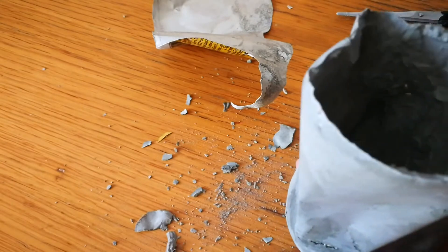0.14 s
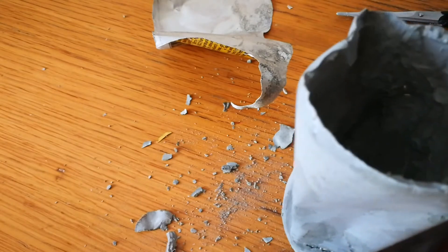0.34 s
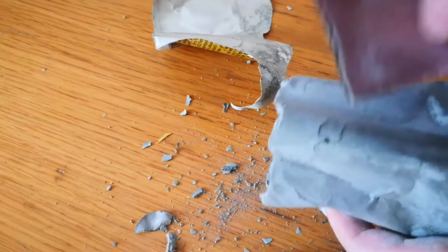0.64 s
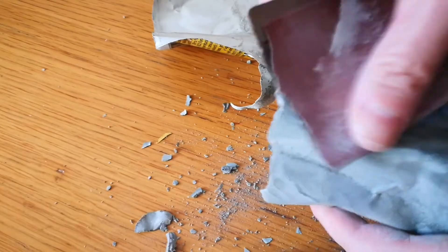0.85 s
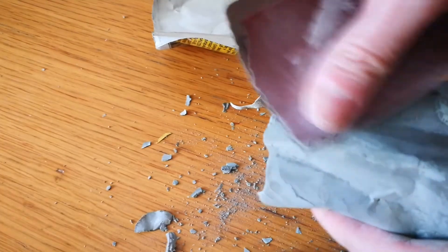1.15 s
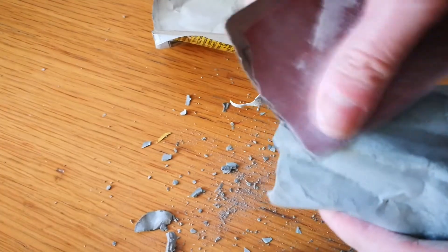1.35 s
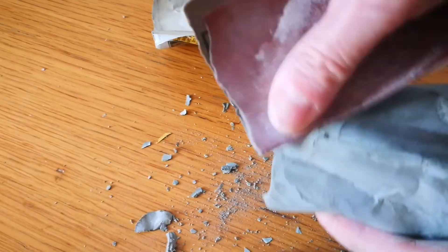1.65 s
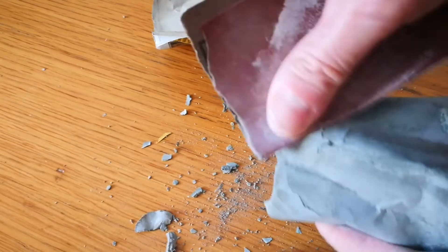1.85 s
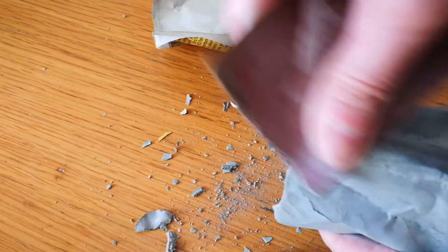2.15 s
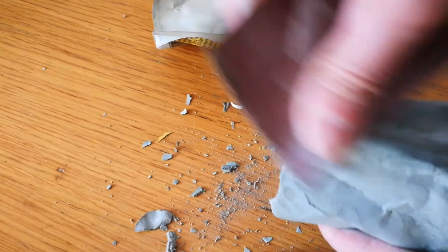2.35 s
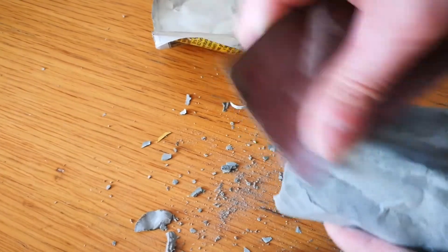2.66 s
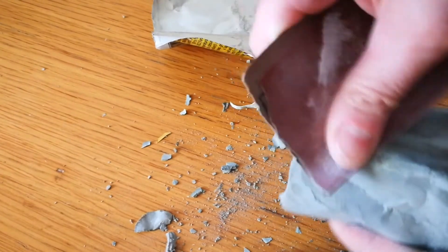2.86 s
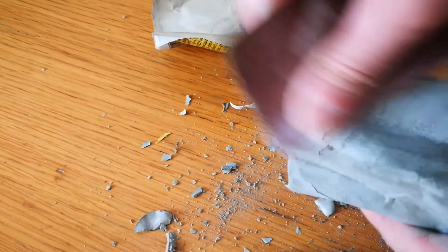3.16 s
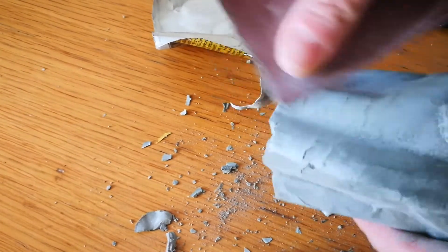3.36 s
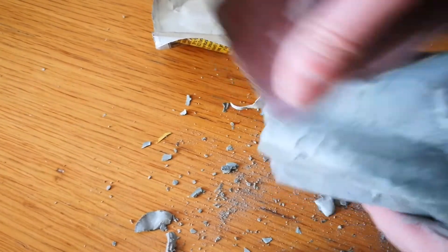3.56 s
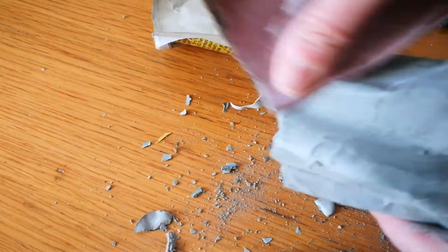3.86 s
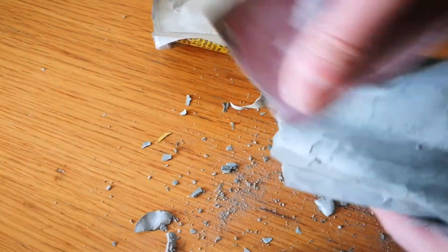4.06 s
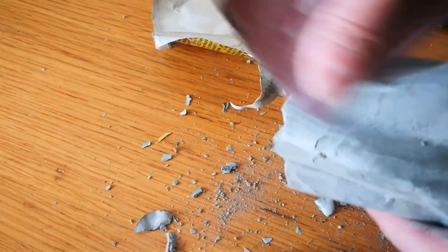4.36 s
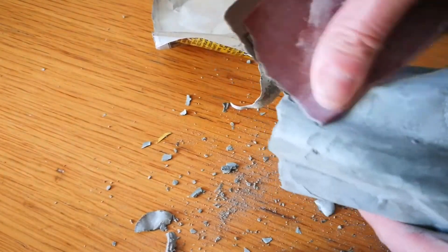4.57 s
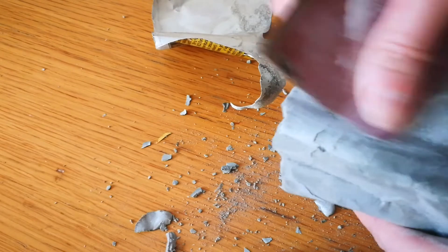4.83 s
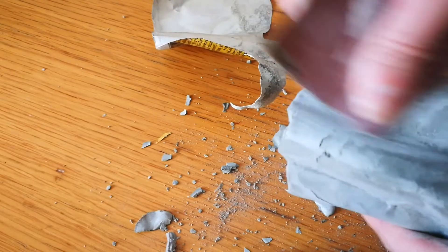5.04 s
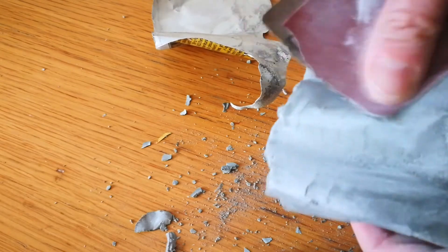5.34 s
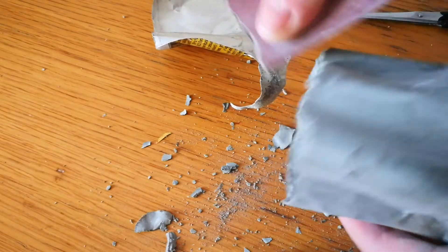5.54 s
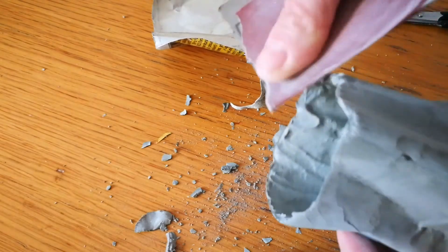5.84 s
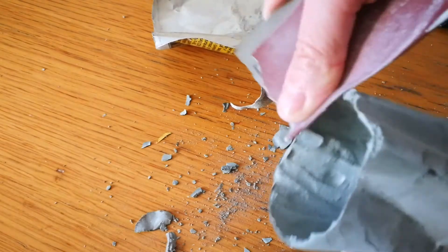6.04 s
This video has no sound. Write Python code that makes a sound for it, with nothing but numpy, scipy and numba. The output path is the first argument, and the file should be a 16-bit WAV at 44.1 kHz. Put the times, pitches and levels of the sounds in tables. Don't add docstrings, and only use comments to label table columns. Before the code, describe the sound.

Stiff sandpaper rasps rapidly back and forth over a small cement pot, in bright gritty bursts broken by short pauses and tiny crumb cracks.

```python
import sys
import numpy as np
from scipy import signal
from scipy.fft import rfft, irfft
from scipy.io import wavfile
from scipy.ndimage import uniform_filter1d
from numba import njit

SR = 44100
rng = np.random.default_rng(int(sys.argv[2]) if len(sys.argv) > 2 else 0)


def amp(db):
    return 10 ** (np.asarray(db, float) / 20)


def write(x):
    x = np.atleast_2d(x).T
    wavfile.write(sys.argv[1], SR, np.round(np.clip(x, -1, 1) * 32767).astype(np.int16))


N = 273420
T = np.arange(N) / SR


def curve(hz, points):
    f, v = np.transpose(points)
    return np.interp(np.log(hz + 1), np.log(f + 1), v)


def causal(db):
    c = irfft(db * np.log(10) / 20)
    c[1:len(c) // 2] *= 2
    c[len(c) // 2 + 1:] = 0
    return irfft(np.exp(rfft(c)))


def unit(x):
    return x / np.sqrt(np.mean(x ** 2))


def walk(rate):
    hold = int(SR / rate)
    levels = np.repeat(rng.standard_normal(N // hold + 1), hold)
    return 1.616 * uniform_filter1d(uniform_filter1d(levels, hold), hold)[:N]


def air():
    # (f/Hz, level/dB per Hz)
    air_colour = [(20, -15), (60, -15), (110, -18), (250, -17.5), (400, -24.5), (800, -27), (8700, -34),
                  (15800, -46)]
    # (f/Hz, level/dB)
    hum_tones = [(100, -75), (147, -77), (238, -77.5), (735, -85)]
    hz = np.linspace(0, SR / 2, N // 2 + 1)
    width = [np.ones_like(hz), np.clip(0.3 + hz / 900, 0, 1)]
    spectrum = rfft(rng.standard_normal((2, N))) * amp(curve(hz, air_colour))
    mid, side = irfft(spectrum * width, N)
    noise = np.array([mid + side, mid - side]) / np.sqrt(np.mean(mid ** 2)) * amp(-71)
    hum = np.zeros(N)
    for f, db in hum_tones:
        level = amp(db - 0.5 + 1.8 * walk(6.3))
        hum += level * np.sin(2 * np.pi * f * T + 0.23 * walk(4.03))
    return noise + hum


def ramp(t, length_s, attack_s, release_s, steep):
    return np.clip(np.minimum(t / attack_s, (length_s - t) / release_s), 0, 1) ** steep


def contact():
    # (start t/s, length t/s, sheet hiss level/dB, swell start to end level/dB, pot wall minus hiss level/dB)
    strokes = [(0.792, 0.17, -35.0, -15, -14), (0.959, 0.11, -30.5, -9.5, -11.5),
               (1.08, 0.089, -31, -16.5, -12.0), (1.181, 0.098, -32.0, 0, -9.0),
               (1.281, 0.082, -32, -12, -9.5), (1.381, 0.095, -30.5, 7, -9.5),
               (1.475, 0.1, -31, -11, -9.5), (1.593, 0.094, -31.5, 0.5, -8),
               (1.687, 0.1, -30.5, -1, -11), (1.798, 0.095, -31, -4, -9), (1.889, 0.11, -31, 6.5, -10.5),
               (2.022, 0.11, -31.5, 6, -8.0), (2.136, 0.085, -30, -1, -10.5),
               (2.251, 0.1, -32.5, -8.0, -10.5), (2.351, 0.099, -30.5, -4, -10.5),
               (2.467, 0.099, -30.5, 5.5, -10.5), (2.574, 0.1, -33, -3, -10.5),
               (2.697, 0.1, -30.5, -5, -10), (2.797, 0.11, -32, 2, -8.5),
               (2.936, 0.11, -31.5, -10.5, -8.5), (3.061, 0.1, -28.5, -10, -13.5),
               (3.444, 0.12, -26.5, -4.5, -10.5), (3.734, 0.11, -29.0, -7, -11.5),
                   (3.849, 0.1, -26, -3, -11), (3.952, 0.092, -26, 3, -10.5),
                   (4.066, 0.11, -27.5, -10, -11), (4.166, 0.098, -25, -1, -13),
                   (4.273, 0.12, -25.5, -0.5, -15.0), (4.398, 0.097, -26, 7, -10.0),
                   (4.515, 0.11, -25.5, -6, -12.5), (4.644, 0.094, -26, 6, -15.0),
                   (4.762, 0.12, -28, -10.5, -16.5), (4.901, 0.17, -27.5, -15.5, -16),
                   (5.271, 0.16, -28, -1, -13), (5.623, 0.11, -29.5, -7.5, -9.5),
                   (5.88, 0.087, -26, 21, -12), (5.973, 0.061, -27.5, 22, -12)]
    touches = [(.55, 0.082, -46, 10, -5.5), (.632, 0.14, -43.5, -3, -8), (.762, 0.043, -46.5, -4, -1.5),
               (3.272, 0.053, -53.5, -5, -7), (3.33, 0.1, -57, -7, -8), (3.4, 0.046, -43.5, -7, -5),
               (3.689, 0.03, -35, -19, -8), (5.205, 0.058, -40, -12, -6), (5.586, 0.044, -33, 13, -15),
               (5.72, 0.042, -43, -1, -6), (5.82, 0.039, -41.5, -4, -6), (6.04, 0.13, -58, -9, -4.5)]
    # (from t/s, to t/s, hiss level/dB)
    creeps = [
        (.55, .8, -52.5),
        (.8, 3.15, -56.5),
        (3.145, 3.263, -60),
        (3.7, 5.052, -50),
        (5.23, 5.414, -51.5),
        (5.62, 5.8, -54),
        (5.845, 6.25, -58.5),
    ]
    sheet_ramp, wall_ramp = (0.028, 0.034, 1.46), (0.019, 0.032, 1.06)
    touch_ramp = (0.011, 0.02, 1.47)
    sheet, wall = np.zeros(N), np.zeros(N)
    passes = ((strokes, sheet_ramp, wall_ramp), (touches, touch_ramp, touch_ramp))
    for rows, on_sheet, on_wall in passes:
        for s, length_s, db, swell_db, rel_db in rows:
            near = slice(int(s * SR), int((s + length_s) * SR))
            t = T[near] - s
            swell = swell_db * (t / length_s - .5)
            sheet[near] += amp(db + 0.25 + swell) * ramp(t, length_s, *on_sheet)
            wall[near] += amp(db + rel_db - 0.8 + 0.46 * swell) * ramp(t, length_s, *on_wall)
    creep = sum(amp(db) * ramp(T - a, b - a, *touch_ramp) for a, b, db in creeps)
    return np.hypot(sheet, creep), np.hypot(wall, creep * amp(-9))


def grit(per_s, patchy_db, spread_db=2):
    slips = rng.random(N) < per_s / SR
    size = slips * amp(spread_db * np.minimum(rng.exponential(size=N), 4))
    size = np.sqrt(np.abs(uniform_filter1d(size ** 2, size=3)))
    size = size * amp(patchy_db * walk(45) + patchy_db * walk(220))
    return unit(size * rng.standard_normal((2, N)))


def crumbs():
    # (t/s, level/dB, pot wall minus hiss level/dB, decay t/ms)
    cracks = [(0.571, -50.5, 4, 3), (.705, -38, -0.5, 3.6), (.824, -26, -20, 2.3), (.868, -31, -21, 3.3),
              (0.983, -41, -17, 1.2), (2.191, -22, -14, 1.2), (3.127, -48, -5, 2), (3.15, -46, 7, 3.9),
              (3.404, -38, 4.5, 1.2), (3.413, -34.5, -5, 3.3), (3.69, -40.5, -5, 0.92),
              (3.362, -51, -12, 2.3), (5.057, -33, -15, 2.7), (5.218, -31.5, -12, 2.6),
              (5.395, -48, -3, 3.7), (5.585, -46.5, 4, 1.5), (5.682, -18, -5, 1.04), (5.751, -41.5, 2, 3),
              (5.764, -35, -4.5, 3.2), (5.823, -32, -16, 2.2), (6.012, -31, -8, 1.5), (6.102, -45, -9, 2.5),
              (6.143, -46, -6.5, 13), (6.163, -40.5, -4.5, 7.3), (6.184, -28, -11, 4.6)]
    out = np.zeros((2, 2, N + 600))
    for s, db, rel_db, ms in cracks:
        crack = rng.choice([-1, 1], (2, 600)) * np.exp(-np.arange(600) / (SR * ms / 1000))
        i = int(s * SR)
        out[:, :, i:i + 600] += amp(db + np.array([0, rel_db]))[:, None, None] * crack
    return out[:, :, :N]


def sanding():
    grip_changes = [
        .95,
        3.33,
        5.5,
    ]
    # (f/Hz, level/dB per Hz)
    colours = [
        [(150, -43), (250, -19.5), (565, -20.5), (2300, -11), (3370, -13.5), (3740, -11.5), (6410, -10),
         (9070, 0.5), (15800, -26.5)],
        [(150, -50), (250, -19.5), (786, -18.5), (1110, -2.5), (1320, -13), (2150, -9.5), (2560, -5),
         (3940, -12), (5120, -7), (5680, -12), (9070, 1.5), (15800, -21.5)],
        [(150, -71), (250, -24), (373, -30), (1060, -18.5), (2040, -13.5), (2470, -11.5), (3940, -10.5),
         (4610, -8), (5480, -10.5), (8910, 4), (10200, -1), (15800, -22)],
        [(150, -40.5), (250, -13.5), (984, -15.5), (1210, -1.5), (1420, -6), (1970, -3), (2690, -10),
         (3090, -8.5), (4610, -9.5), (6640, -9.5), (9070, -3), (15800, -28.5)],
    ]
    # (f/Hz, width f/Hz, lift level/dB)
    rings = [
        [(1020, 270, 3.5), (2380, 150, 5), (4150, 420, 0)],
        [(1106, 180, -8), (2540, 220, 0), (3080, 140, 5.5), (4970, 220, -4), (8160, 980, 2), (10420, 180, 6)],
        [(1090, 390, 4), (1763, 130, 4.5), (2490, 110, 2), (4520, 350, 1.5), (7700, 1100, 1.5), (8270, 350, -2)],
        [(1230, 84, 6), (1930, 85, 5.5), (3173, 63, 10.5), (4760, 250, 6.5), (9270, 720, 3.5), (7860, 400, 1.5)],
    ]
    # (f/Hz, side minus mid level/dB)
    spread = [(60, -2), (110, -10), (200, -10), (380, -23), (700, -0.5), (1290, -16.5), (2380, -2),
              (4400, 7), (8120, 1), (15000, -29)]
    # (f/Hz, left minus right level/dB)
    lean = [(60, -45), (110, -14), (200, -3), (380, -3), (700, 3), (1290, -0.5), (2380, 0.5), (4400, -1.5),
            (8120, -1), (15000, 9.5)]
    split_hz = 3500
    hz = np.linspace(0, SR / 2, 1025)
    low = 1 / (1 + (hz / split_hz) ** 8)
    sheet, wall = contact()
    drives = np.array([grit(16000, 0.96) * sheet, grit(11000, 0.96) * wall]) + crumbs()
    edges = [0] + [int(s * SR) for s in grip_changes] + [N]
    out = np.zeros((2, N + 2047))
    for a, b, colour, modes in zip(edges, edges[1:], colours, rings):
        db = curve(hz, colour)
        for f, width, lift_db in modes:
            db = db + lift_db / (1 + (2 * (hz - f) / width) ** 2)
        for share, drive in zip((1 - low, low), drives):
            part_db = db + 10 * np.log10(share + 1e-9)
            part_db = part_db - 10 * np.log10(np.mean(amp(2 * part_db)))
            side_db = part_db + curve(hz, spread) - 5.0
            mid = signal.oaconvolve(drive[0, a:b], causal(part_db))
            side = signal.oaconvolve(drive[1, a:b], causal(side_db))
            out[:, a:b + 2047] += np.array([mid + side, mid - side])
    tilts = [causal(sign * curve(hz, lean) / 2) for sign in (1, -1)]
    return np.array([signal.oaconvolve(x, tilt)[:N] for x, tilt in zip(out, tilts)])


def bend(x, share=0.41, near_ms=0.1965, far_ms=2.2, count=4):
    out = x.copy()
    for ms in np.geomspace(near_ms, far_ms, count):
        for ch in range(2):
            lag = ms * SR / 1000 * amp(1.703 * walk(3.5) + 0.38 * walk(14))
            echo = np.interp(np.arange(N) - lag, np.arange(N), x[ch])
            out[ch] += share * np.tanh(walk(6)) * echo
    return out


def knocks():
    # (t/s, f/Hz, peak level/dB, t60 t/s)
    rim_hits = [
        (6.4, 1260, -38, 0.05),
        (3.128, 1200, -41, .03),
        (.822, 2500, -35, .04),
    ]
    out = np.zeros(N)
    for s, hz, db, t60_s in rim_hits:
        t = np.maximum(T - s, 0)
        envelope = amp(db - 60 * t / t60_s) * (1 - np.exp(-t / .001))
        out += envelope * np.sin(2 * np.pi * hz * t)
    return out


def ride_band(x, order, hz, kind, db):
    band = signal.sosfiltfilt(signal.butter(order, hz, kind, fs=SR, output="sos"), x)
    return x + band * (amp(db) - 1)


def hand(x):
    # (t/s, left minus right level/dB, deep wall tones level/dB, free wall ring level/dB,
    # curled edge facing the phone level/dB)
    hand_moves = [(.6, 1, 6, 0.5, 5.5), (.85, 4, -2.5, 1.5, -1.5), (1.1, 5, -21, -6.5, 0),
                  (1.99, 4.5, 3, 1, 1), (2.63, 4, 6, 3.5, 1.5), (3.1, 2, 3.5, 3, 3.5),
                  (3.27, 6, -5, 0, 4.5), (3.33, 0.5, 13, 0, 3.5), (3.5, 5, -2, -1, 3.5),
                  (3.8, 4.5, -3, -1, 0.5), (4.3, 4.5, 5, 0, -1), (4.48, 3, 4.5, -1.5, 1),
                  (4.75, 4.5, 10, 0, 2.1), (5.15, 3, -11, -0.5, -3), (5.3, 2, -2, 0, 6),
                  (5.5, 4.5, -7, 6, -5.5), (5.7, 2, 3.5, -0.5, 0.8), (6.2, 4, 0.5, 4, -1.5)]
    s, pan_db, deep_db, ring_db, edge_db = np.transpose(hand_moves)
    x = ride_band(x, 2, [4000, 7000], "band", np.interp(T, s, edge_db))
    x = ride_band(x, 2, [850, 1900], "band", np.interp(T, s, ring_db))
    x = ride_band(x, 3, 650, "low", np.interp(T, s, deep_db))
    pan_db = np.interp(T, s, pan_db) - 1.74
    return x * amp(np.array([pan_db, -pan_db]) / 2)


@njit
def walls(x, lags, gain, damp):
    line, soft, out = np.zeros((8, 4096)), np.zeros(8), np.zeros((2, len(x)))
    for i in range(len(x)):
        total = 0.
        for k in range(8):
            soft[k] += (1 - damp) * (gain[k] * line[k, (i - lags[k]) & 4095] - soft[k])
            total += soft[k]
            out[k % 2, i] += soft[k]
        for k in range(8):
            line[k, i & 4095] = x[i] + soft[k] - total / 4
    return out


def scene():
    t60_s, damp, room_db = 0.49, 0.11, -20
    rub = hand(bend(sanding()) + knocks())
    lags = rng.integers(500, 2400, 8)
    room = walls(rub.mean(axis=0), lags, amp(-60 * lags / SR / t60_s), damp)
    return rub + amp(room_db) * room + air()


def duck_bass(dry, resume_s):
    # (t/s, depth level/dB, half length t/s)
    dropouts = [(1.407, 16, 0.027), (1.826, 16, 0.012), (1.935, 9, 0.013), (2.073, 12, .015),
                (2.29, 7, 0.014), (2.407, 16, .015), (2.52, 14, 0.023), (2.96, 21, 0.02), (3.494, 22, .022),
                (3.898, 18, 0.02), (4.118, 20, 0.029), (4.39, 14, 0.017), (4.443, 24, 0.022),
                (4.58, 20, 0.016), (4.82, 28, 0.019), (5.005, 30, 0.044), (5.335, 25, 0.064)]
    hz = np.linspace(0, SR / 2, N // 2 + 1)
    bass = irfft(rfft(dry) / (1 + (hz / 430) ** 8), N)
    heard = uniform_filter1d(np.mean(dry ** 2, axis=0), size=2600, origin=900)
    duck = 1 / (1 + (np.abs(heard) / amp(-29) ** 2) ** 1.14)
    trim = np.where(T > resume_s, amp(2.0), 1)
    trim = trim * amp(-sum(db * np.exp(-((T - s) / half_s) ** 4) for s, db, half_s in dropouts))
    return dry - bass * (1 - duck * trim)


def band_limit(x):
    return signal.sosfilt(signal.butter(12, 16450, fs=SR, output="sos"), x)


def record(dry):
    # (from t/s, to t/s)
    silence = (0.413, .5705)
    x = duck_bass(.42 * np.tanh(dry / .42), silence[1])
    gate = np.clip(np.maximum(silence[0] - T, T - silence[1]) / 0.0014, 0, 1)
    top = signal.ellip(10, .2, 70, 15650, fs=SR, output="sos")
    return band_limit(signal.sosfilt(top, x * gate))


dry = scene()
out = record(dry)
write(out)
```